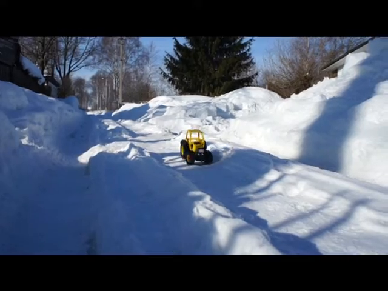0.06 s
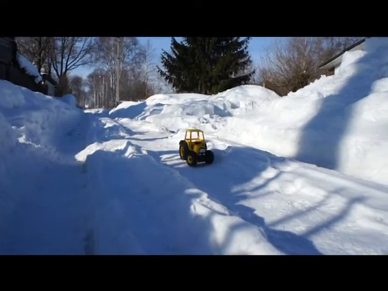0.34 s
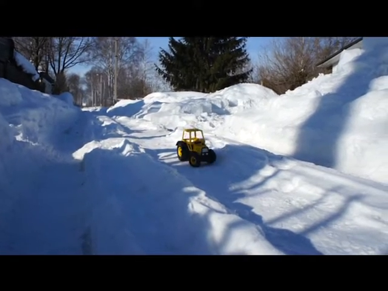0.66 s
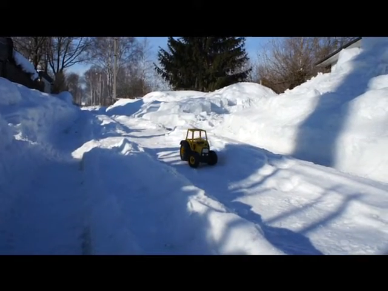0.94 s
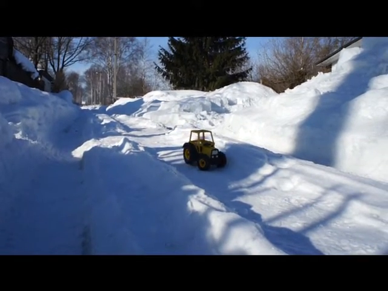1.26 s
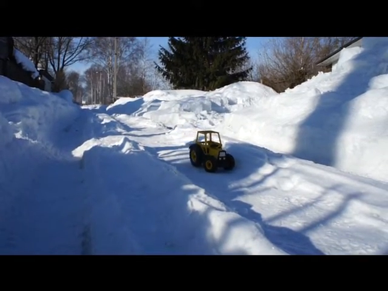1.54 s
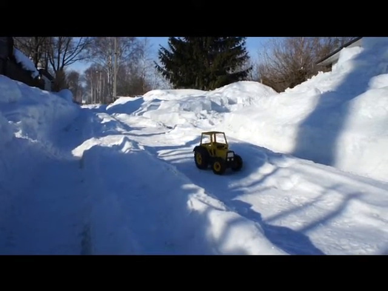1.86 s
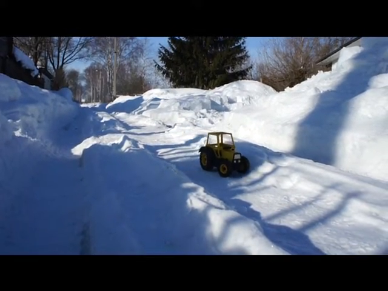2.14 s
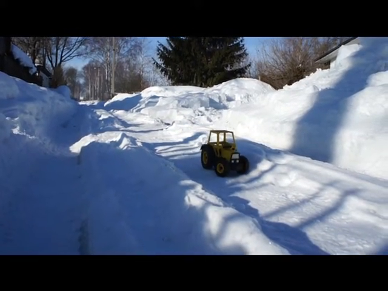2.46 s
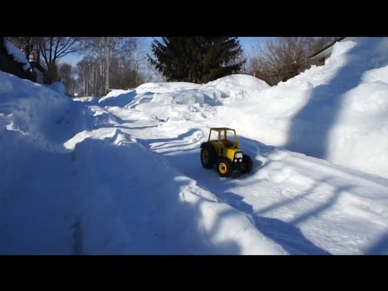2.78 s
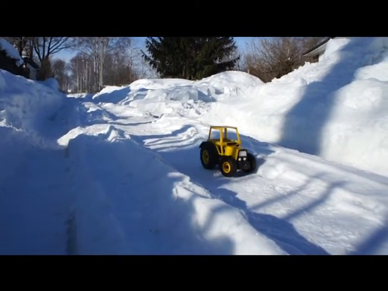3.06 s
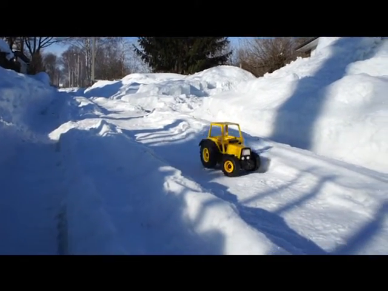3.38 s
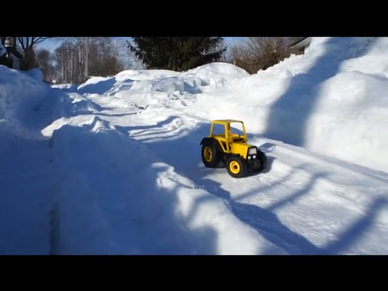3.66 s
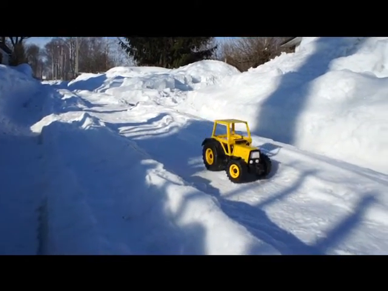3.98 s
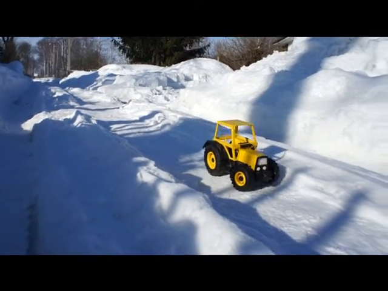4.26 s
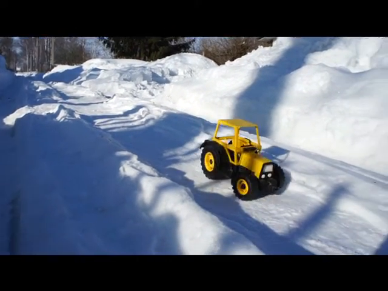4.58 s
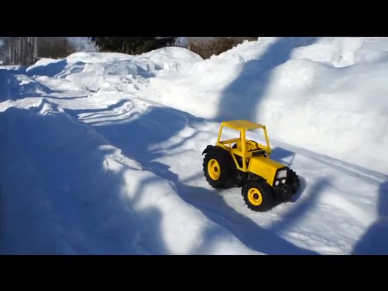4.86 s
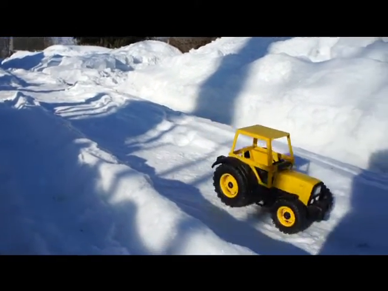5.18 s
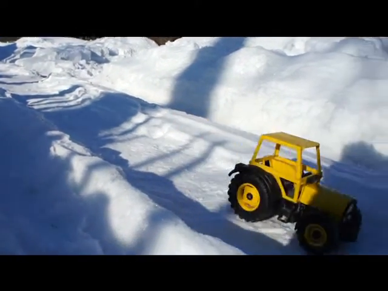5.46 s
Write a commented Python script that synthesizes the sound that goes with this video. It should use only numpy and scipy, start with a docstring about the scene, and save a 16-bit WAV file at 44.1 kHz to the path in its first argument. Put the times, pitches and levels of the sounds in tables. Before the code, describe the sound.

A small motorized toy tractor whirs, rattles and crunches over packed snow, growing louder as it approaches, with one low thump near the end.

```python
"""Toy tractor on packed snow.

A small battery toy crawls between snow banks towards a hand-held camera. Plastic gears whir and labour
in surges under the motor's whizz. Treads crunch the crust and ring the panels, loose parts clack, the
hollow body drones and knocks. Faint open air behind. Near the end a bump on the camera: one low thump."""
import sys
import numpy as np
from scipy import signal
from scipy.fft import rfft, irfft, next_fast_len
from scipy.io import wavfile
from scipy.ndimage import uniform_filter1d, map_coordinates

SR = 44100
rng = np.random.default_rng(int(sys.argv[2]) if len(sys.argv) > 2 else 0)


def transcribe(signal):
    """Save signal, clipped to [-1, 1], as a 16-bit WAV file at the path in sys.argv[1]."""
    frames = np.atleast_2d(signal).T
    limited = np.clip(frames, -1, 1)
    pcm = np.round(limited * 32767).astype(np.int16)
    wavfile.write(sys.argv[1], SR, pcm)


N = 252472
T = np.arange(N) / SR

# Table levels are relative: trims and filters follow.
# gear whir spectrum: f/Hz, gain/dB
WHIR_EQ = [(100, -35), (250, -14), (500, -3), (850, 1.5), (1100, 1), (2150, -1.5), (3200, -0.5),
           (5700, 5.5), (6600, 3.5), (8000, 3), (13000, -43)]
# motor whizz spectrum: f/Hz, gain/dB
WHIZZ_EQ = [(4500, -17), (6500, 2), (7600, -1), (9000, 5.5), (10800, 4), (12100, 2.5), (12700, -11),
            (13200, -64)]
# whizz against the drive level: t/s, level/dB
WHIZZ_SHARE = [(0, 1.5), (0.15, -2.5), (0.7, -1), (1.3, 0), (2.35, -1.5), (3.4, 0.5), (4.05, -0.5),
               (5.35, -4.5), (5.65, -1)]
# motor whine against the drive level: t/s, f/Hz, level/dB
WHINE_TRACK = [(0, 10350, -10.5), (1.1, 10360, -7.5), (1.3, 10120, -6.5), (2.3, 9990, -8.5),
               (3.05, 9990, -9), (3.14, 10780, -9), (3.65, 10540, -8), (3.8, 10280, -10), (5.72, 10330, -7)]
# treads bite, gears labour: start/s, rise/dB, hold/s
SURGES = [(0.107, 3, 0.068), (0.368, 3.5, 0.19), (0.578, 6, 0.029), (0.706, 1.5, 0.053), (0.923, 2, 0.026),
          (1.118, 3.5, 0.27), (1.98, 3, 0.23), (2.491, 3.5, 0.016), (2.676, 2.5, 0.37), (3.01, 2, 0.17),
          (3.445, 3, 0.39), (4.335, 3.5, 0.052)]
# gears fall slack: t/s, depth/dB
LULLS = [(0.07, 1.5), (0.32, 2), (0.512, 10.5), (1.952, 8), (2.975, 12.5), (4.75, 2.5)]
# gears scrape the housing: start/s, end/s, level/dB
GRINDS = [(0.752, 0.967, -51), (1.067, 1.246, -50), (2.0, 2.94, -54), (2.99, 4.19, -51)]
# gearbox housing: f/Hz, width/Hz, gain/dB
HOUSING_MODES = [(2840, 54, -6), (3290, 180, -2), (3850, 72, 3)]
# plastic panels: f/Hz, width/Hz, far gain/dB, near gain/dB
PANEL_MODES = [(1745, 510, 5, 1), (2460, 116, -6, 8), (2756, 98, 8.5, 5.5), (3050, 216, 6, -7),
               (3425, 120, 0.5, 6), (3806, 162, 8.5, -3), (4583, 220, 0.5, -10.5), (5020, 99, -12, -13),
               (7560, 170, 1, -6), (9900, 2700, 2, -37)]
# big tread crunches: centre/s, level/dB, nominal half-length/s, brightness/dB
CRUNCHES = [(0.125, -42, 0.016, -8), (0.248, -37, 0.0036, 7), (0.348, -37, 0.0052, 11.5),
            (0.419, -33.5, 0.0063, 2.5), (0.593, -38.5, 0.0055, 10.5), (0.648, -41, 0.0049, 9),
            (1.025, -35.5, 0.0036, 9), (1.124, -29.5, 0.0036, 14), (1.155, -34, 0.0018, 23.5),
            (1.232, -38, 0.0091, 9), (1.313, -30.5, 0.0036, 5), (1.585, -37, 0.0042, -1),
            (2.127, -35.5, 0.0054, -0.5), (2.516, -35, 0.0044, -2), (2.683, -33, 0.0024, 15),
            (2.809, -32.5, 0.0058, 9), (2.918, -30, 0.0037, -0.5), (2.943, -32.5, 0.0046, 5),
            (3.001, -34, 0.0055, 22), (3.05, -31.5, 0.0059, 10), (3.474, -34, 0.008, 0.5),
            (3.918, -29.5, 0.0071, 8), (4.045, -29.5, 0.011, 0), (4.156, -27, 0.0028, 18),
            (4.321, -29, 0.0039, 8), (4.349, -25.5, 0.0045, 11), (4.44, -26, 0.0034, 17),
            (4.488, -23, 0.0055, 13.5), (4.632, -27.5, 0.017, 23), (4.705, -26, 0.0042, 10),
            (4.822, -24.5, 0.0063, 4.5), (4.847, -24, 0.0083, 3), (4.8975, -21, 0.0041, 11),
            (5.023, -27.5, 0.0052, 8.5), (5.082, -23, 0.016, 1.5), (5.124, -23.5, 0.0095, 0.5),
            (5.149, -22, 0.0047, -8), (5.306, -21.5, 0.0057, 9), (5.418, -20, 0.0026, -9),
            (5.46, -20, 0.0027, -4), (5.483, -26.5, 0.0035, 9), (5.535, -26.5, 0.015, -21),
            (5.578, -25.5, 0.013, 27), (5.635, -22.5, 0.0082, 2), (5.692, -22.5, 0.0021, 9.5)]
# crunch spectrum: f/Hz, gain/dB
CRUNCH_EQ = [(100, -19), (300, -1.5), (600, 10.5), (1100, 3.5), (2000, -0.5), (3500, 0), (5500, 4.5),
             (7000, 3), (10500, 2), (12400, -6), (13400, -84)]
# crust snaps: t/s, level/dB, f/Hz
SNAPS = [(0.374, -27.5, 3500), (1.1255, -20.5, 6400), (2.915, -24.5, 2510), (4.352, -15, 2600),
         (4.424, -16, 5000), (4.5462, -5.5, 5370), (4.619, -16, 4520), (4.821, -18, 2690),
         (4.896, -25, 3800), (5.018, -17, 3200), (5.083, -18, 2990), (5.145, -16, 3000),
         (5.2562, -20, 2400), (5.4143, -18, 2800), (5.459, -16.5, 2500), (5.631, -18, 2500)]
# hollow body: f/Hz, width/Hz, far gain/dB, near gain/dB
BODY_MODES = [(530, 78, -50, -4), (583, 49, -16, 11.5), (663.4, 41, 15, 18.5), (760, 49, 12, -4)]
# drive strains or slackens, drone follows: centre/s, change/dB, half-length/s
STRAINS = [(0.766, 7, 0.045), (0.997, 7, 0.028), (1.294, 9, 0.079), (1.547, 7, 0.06), (2.504, 9, 0.03),
           (3.076, 6, 0.088), (3.56, 2.5, 0.32), (4.434, -1.5, 0.1), (4.85, -14, 0.046), (4.992, -5, 0.016),
           (5.106, -10, 0.036), (5.23, -5, 0.014), (5.575, -7, 0.011)]
# hard jolts to the body: t/s, level/dB
KNOCKS = [(0.16, -34), (0.411, -32), (0.551, -33.5), (1.324, -30), (1.835, -34), (1.881, -32),
          (2.096, -31.5), (2.18, -31.5), (2.711, -31.5), (2.914, -28.5), (3.24, -32.5), (3.468, -41),
          (4.036, -27.5), (4.4, -38), (4.59, -28), (4.768, -20.5), (4.828, -21), (4.914, -21.5),
          (4.965, -31), (5.019, -23), (5.072, -21.5), (5.123, -21.5), (5.256, -27), (5.432, -24),
          (5.499, -14.5), (5.524, -20.5)]
# loose parts hit the chassis: t/s, level/dB, f/Hz
CLACKS = [(0.183, -34, 2780), (0.356, -29.5, 1810), (0.373, -27.5, 2830), (0.422, -35, 3400),
          (0.648, -35, 3100), (1.025, -30.5, 3010), (1.169, -36, 1900), (1.324, -27, 1740),
          (1.524, -34.5, 1770), (1.816, -33, 1720), (2.099, -34, 2020), (2.915, -24.5, 1770),
          (3.228, -30.5, 2770), (3.24, -29, 1647), (3.974, -28, 2750), (4.037, -28, 1750),
          (4.105, -28, 2460), (4.768, -22.5, 2510), (5.127, -22.5, 2820), (5.254, -21.5, 1625),
          (5.339, -25, 1240), (5.416, -19, 1670)]
# wheel drops into a rut: t/s, level/dB, f/Hz
THUDS = [(0.123, -44, 356), (1.489, -42, 295), (2.275, -43, 200)]
# camera shudders: start/s, length/s, f/Hz, level/dB, left minus right/dB
SHUDDERS = [(5.3003, 0.036, 86, -11.5, 0.5), (5.3011, 0.048, 255, -23, -9),
            (5.3005, 0.0069, 210, -13, -8.5), (5.305, 0.0267, 170, -21, -8), (5.321, 0.019, 480, -25.5, 9)]
# approach: t/s, distance/m
DISTANCE = [(0, 3.87), (1.7, 2.26), (3.3, 1.48), (4.2, 0.81), (4.7, 0.54), (5.72, 0.37)]
# path to the microphone ports: t/s, left port lag/ms, snow bounce lag/ms, left minus right/dB
PATH = [(0, 0.03, 1.1, 1.5), (2, 0.057, 1.2, 0), (4.2, 0.052, 1.05, 0), (5.1, 0.055, 1.52, -0.5),
        (5.72, 0.11, 2.5, -0.5)]
# open air spectrum: f/Hz, gain/dB
AIR_EQ = [(25, -36), (60, -28), (110, -11.5), (170, -3.5), (280, 0), (450, -2.5), (1000, -4), (4000, -17.5),
          (13000, -60)]


def gears(drive_db, shaft_hz=40, wobble=0.038, throb_db=0.1, flutter_db=1.6):
    """Teeth tick densely, barely pulsed by an uneven shaft; the motor whizzes above."""
    shaft_rad = 2 * np.pi * np.cumsum(shaft_hz * (1 + wobble * walk(2.3))) / SR
    pulse_db = throb_db * (np.cos(shaft_rad) + np.cos(2 * shaft_rad))
    teeth = grains(rate_hz=5000, spread_db=0.5) * undb(pulse_db + flutter_db * walk(90))
    whir = plastic(teeth, WHIR_EQ, waver_db=2.5, panels_db=3.5)
    motor = grains(rate_hz=24000, spread_db=1.5) * undb(pulse_db)
    whizz = plastic(motor, WHIZZ_EQ, waver_db=5.5)
    return whir * undb(drive_db - 3) + whizz * undb(drive_db + curves(WHIZZ_SHARE)[0] - 4.5)


def gear_load_db(attack_s=0.004, release_s=0.012, lull_s=0.017):
    """Load jumps as the treads bite, holds, eases off; lulls dip it."""
    load_db = np.zeros(N)
    for start_s, rise_db, hold_s in SURGES:
        attack = np.clip((T - start_s) / attack_s, 0, 1)
        release = np.exp(-np.maximum(T - start_s - hold_s, 0) / release_s)
        load_db += rise_db * attack * release
    for at_s, depth_db in LULLS:
        load_db -= depth_db * np.exp(-((T - at_s) / lull_s) ** 2)
    return load_db


def whine(drive_db, near_loss_db=12, tremble_hz=300, wander=0.009):
    """Thin motor tone with trembling pitch; sinks under the gears close by."""
    hz, share_db = curves(WHINE_TRACK)
    tone = np.sin(2 * np.pi * np.cumsum(hz * (1 + wander * walk(tremble_hz))) / SR)
    return unit(tone) * undb(drive_db + share_db - near_loss_db * nearness(T))


def grind(fade_s=0.016, waver_db=2.3):
    """Teeth scrape under load and ring the housing in spells."""
    teeth = ring(grains(rate_hz=1500, spread_db=3.5), hz=3430, width_hz=1800)
    scrape = unit(sum(undb(db) * ring(teeth, hz, width_hz) for hz, width_hz, db in HOUSING_MODES))
    gate = sum(undb(db) * np.clip(np.minimum(T - start_s, end_s - T) / fade_s, 0, 1)
               for start_s, end_s, db in GRINDS)
    return scrape * undb(waver_db * walk(15)) * gate


def crunches(rows, trim_db=-2.5, ring_db=-8, crumble_db=-14, crumble_s=0.016):
    """Each crunch: a short swarm of cracks, settling crumbs, one ringing panel."""
    dull_power, bright_power, rings = np.zeros((3, N))
    ticks = grains(rate_hz=5000, spread_db=-2)
    for at_s, db, half_s, bright_db in rows:
        span = slice(max(int((at_s - 0.1) * SR), 0), int((at_s + 0.1) * SR))
        t = T[span] - at_s
        burst = undb(db + trim_db) ** 2 / (1 + (t / (0.87 * half_s)) ** 6)
        crumbs = undb(db + crumble_db) ** 2 * (t > 0) * np.exp(-np.abs(t) / crumble_s)
        power = burst + crumbs
        bright_ratio = undb(bright_db - 4) ** 2
        dull_power[span] += 2 * power / (1 + bright_ratio)
        bright_power[span] += 2 * power * bright_ratio / (1 + bright_ratio)
        aim_hz = 2085 * 2 ** (bright_db / 14.5)  # sharper crunch, smaller panel
        panel_hz = min((mode[0] for mode in PANEL_MODES), key=lambda hz: abs(hz - aim_hz))
        panel = ring(ticks[span] * np.sqrt(power), panel_hz, width_hz=220)
        rings[span] += undb(ring_db) * unit(panel) * np.sqrt(power.mean())
    cracks = plastic(grains(rate_hz=7000, spread_db=2.5), CRUNCH_EQ, waver_db=2)
    treble = signal.sosfiltfilt(signal.butter(2, 3200, "high", fs=SR, output="sos"), cracks)
    return (cracks - treble) * np.sqrt(dull_power) + treble * np.sqrt(bright_power) + rings


def lugs(level_db, rate_hz=11, jitter_s=0.02, spread_db=3.5, near_loss_db=7, half_s=0.003, count=90):
    """Lugs land unevenly, harder under load, less prominent close by: crunch and jolt rows."""
    late, crunch, bright, jolt = np.sqrt(3) * rng.uniform(-1, 1, (count, 4)).T
    at_s = (np.arange(count) + 0.5) / rate_hz + jitter_s * late
    lug_db = np.interp(at_s, T, level_db) - near_loss_db * nearness(at_s)
    crunch_db = lug_db - 34.5 + spread_db * crunch
    jolt_db = lug_db - 38 + spread_db * jolt
    bright_db = 6 + 4 * bright
    crunch_rows = np.column_stack([at_s, crunch_db, np.full(count, half_s), bright_db])
    jolt_rows = np.column_stack([at_s, jolt_db])
    inside = (at_s > 0) & (at_s < T[-1])
    return list(crunch_rows[inside]), list(jolt_rows[inside])


def snaps(decay_s=0.0012):
    """Crust breaks at once: a bright crack."""
    out, t = np.zeros(N), T[:N // 500]
    for at_s, db, hz in SNAPS:
        crack = unit(ring(rng.standard_normal(len(t)), hz, width_hz=6000))
        add_at(out, at_s, undb(db) * crack * np.exp(-t / decay_s))
    return butter(out, 3, [450, 10500], "band")


def grit(drive_db, share_db=-8, near_loss_db=2):
    """Ice crystals snap under the lugs: fine treble ticks."""
    ticks = butter(grains(rate_hz=700, spread_db=2.5), 3, [2200, 10500], "band")
    return unit(ticks) * undb(drive_db + share_db - near_loss_db * nearness(T))


def body(drone_db, jolts, flutter_db=2, attack_s=0.003, decay_s=0.012, far_hz=700, near_hz=630):
    """Running gear keeps the hollow shell droning; jolts set it chattering, each at its own pitch."""
    strain_db = sum(db * np.exp(-((T - at_s) / half_s) ** 4) for at_s, db, half_s in STRAINS)
    drive = grains(rate_hz=1100, spread_db=0.5) * undb(flutter_db * walk(24.97))
    shell = unit(turning_modes(drive, BODY_MODES, waver_db=-1.5)) * undb(drone_db + strain_db)
    t = T[:SR // 12]
    push = (1 - np.exp(-t / attack_s)) * np.exp(-t / decay_s)
    chatter = 1 + 0.64 * (walk(220) + 1j * walk(220))  # roughens level and phase
    for at_s, db in jolts:
        hz = (far_hz + (near_hz - far_hz) * nearness(at_s)) * (1 + 0.032 * rng.standard_normal())
        knock = undb(db - 6.5) * push / push.max() * np.exp(2j * np.pi * hz * t)
        rough = chatter[int(at_s * SR):][:len(t)]
        add_at(shell, at_s, np.imag(rough * knock[:len(rough)]))
    return butter(shell, 2, [260, 1800], "band")  # a small shell radiates little bass


def clacks(decay_s=0.0057, tick_s=0.001, pair_ratio=1.13, pair_db=-7, tick_db=-4, trim_db=-1):
    """A loose part hits the chassis: dry tick, then two close panel modes."""
    out, t = np.zeros(N), T[:SR // 12]
    for at_s, db, hz in CLACKS:
        phase = 2 * np.pi * hz * t
        panel = (np.sin(phase) + undb(pair_db) * np.sin(pair_ratio * phase)) * np.exp(-t / decay_s)
        tick = unit(ring(rng.standard_normal(len(t)), hz, width_hz=3000)) * np.exp(-t / tick_s)
        add_at(out, at_s, undb(db + trim_db) * (panel + undb(tick_db) * tick))
    return butter(out, 2, [700, 6000], "band")


def thuds(width_hz=170, decay_s=0.016, trim_db=-2):
    """A soft tyre lands on packed snow: a short dull burst."""
    out, t = np.zeros(N), T[:SR // 10]
    for at_s, db, hz in THUDS:
        burst = rng.standard_normal(len(t)) * np.exp(-t / decay_s)
        thud = ring(ring(burst, hz, width_hz), hz, width_hz)
        add_at(out, at_s, undb(db + trim_db) * thud / np.abs(thud).max())
    return butter(out, 2, 140, "high")


def bump(release_s=5.3557, tick_s=0.00051, tick_db=-12.5):
    """The camera shudders during contact; a dull tick on release."""
    out = pan(0) * undb(tick_db) * np.exp(-((T - release_s) / tick_s) ** 2)
    for start_s, length_s, hz, db, pan_db in SHUDDERS:
        contact = signal.windows.tukey(int(length_s * SR), 0.67)
        shudder = contact * np.sin(2 * np.pi * hz * T[:len(contact)])
        add_at(out, start_s, pan(pan_db) * undb(db) * shudder)
    return out


def rasp(start_s=5.302, length_s=0.041, hz=12300, width_hz=3200, db=-33):
    """A brief high rasp on the thump."""
    hiss = unit(ring(ring(rng.standard_normal(N), hz, width_hz), hz, width_hz))
    return undb(db) * hiss * np.sin(np.pi * np.clip((T - start_s) / length_s, 0, 1))


def snow_lane(x, cracks, bounce_gain=0.068, banks_ms=(0.9, 1.45), lump_ms=0.37, lumps=3):
    """Direct sound, snow bounce and scatter off lumpy banks reach two ports; cracks mostly direct."""
    port_ms, bounce_ms, pan_db = curves(PATH)
    arrival = x + cracks + bounce_gain * delay(x, bounce_ms)
    analytic = signal.hilbert(x + undb(-7) * cracks, next_fast_len(N))[:N]
    echoes = np.zeros((2, N))
    for side, bank_ms in enumerate(banks_ms):
        for k in range(lumps):
            lag_s = (bank_ms + lump_ms * k ** 1.3) / 1000
            phase_drift = np.exp(1j * np.pi * walk(45))
            add_at(echoes[side], lag_s, np.real(analytic * phase_drift) / np.sqrt(lumps))
    scatter = colour(echoes, [(650, -9), (2500, -1.8), (8000, 0.8)])
    ports = np.array([delay(arrival, port_ms), arrival]) + scatter
    return ports * undb(np.array([pan_db, -pan_db]) / 2)


def open_air(db=-53.5):
    """Faint low rush, partly different at each port."""
    common, left, right = rng.standard_normal((3, N))
    return unit(colour(common + np.array([left, right]), AIR_EQ)) * undb(db)


def plastic(x, eq, waver_db, panels_db=0):
    """Excitation plus panel resonances, coloured; rms 1."""
    return unit(colour(x + undb(panels_db) * turning_modes(x, PANEL_MODES, waver_db), eq))


def turning_modes(x, modes, waver_db):
    """Mode levels waver as the toy rocks and shift as it turns side-on."""
    near = nearness(T)
    return sum(ring(x, hz, width_hz) * undb(far_db + near * (near_db - far_db) + waver_db * walk(9.7))
               for hz, width_hz, far_db, near_db in modes)


def nearness(at_s):
    """0 far off, 1 close and side-on at the end."""
    return (at_s / T[-1]) ** 2


def grains(rate_hz, spread_db):
    """Random clicks of uneven size; rms 1."""
    size = undb(spread_db * np.minimum(rng.standard_exponential(N), 4))
    return unit((rng.random(N) < rate_hz / SR) * size * rng.standard_normal(N))


def walk(rate_hz):
    """Random steps, smoothed twice; spread near 1."""
    hold = max(int(SR / rate_hz), 1)
    steps = np.repeat(rng.standard_normal(N)[:N // hold + 1], hold)
    return 1.204 * uniform_filter1d(uniform_filter1d(steps, hold), hold)[:N]


def colour(x, eq):
    """Filter by (f/Hz, gain/dB) points."""
    hz, db = np.transpose(eq)
    size = next_fast_len(N + 4096)
    bins_hz = np.maximum(np.fft.rfftfreq(size, 1 / SR), 1)
    gain = undb(np.interp(np.log(bins_hz), np.log(hz), db))
    return irfft(rfft(x, size) * gain, size)[..., :N]


def ring(x, hz, width_hz):
    """One resonance."""
    return signal.lfilter(*signal.iirpeak(hz, hz / width_hz, SR), x)


def butter(x, order, hz, kind):
    """Causal filter, flat passband."""
    return signal.sosfilt(signal.butter(order, hz, kind, fs=SR, output="sos"), x)


def delay(x, ms):
    """Moving delay."""
    return map_coordinates(x, [np.arange(N) - ms * SR / 1000], order=3)


def add_at(out, at_s, x):
    """Mix x in place, cut at the end of out."""
    span = out[..., int(at_s * SR):][..., :x.shape[-1]]
    span += x[..., :span.shape[-1]]


def curves(table):
    """Columns after t/s, interpolated per sample."""
    at_s, *columns = np.transpose(table)
    return [np.interp(T, at_s, column) for column in columns]


def pan(db):
    """Stereo gains for left minus right."""
    return undb(np.array([[db], [-db]]) / 2)


def undb(db):
    """dB to gain."""
    return 10 ** (np.asarray(db) / 20)


def unit(x):
    """Scale to rms 1."""
    return x / np.sqrt(np.mean(x ** 2))


def scene(rattle_low_hz=110, rattle_top_hz=12900):
    """The tractor in its lane, drive and drone scaled by 1 / distance; bump and open air."""
    distance_db = -20 * np.log10(curves(DISTANCE)[0])
    level_db = distance_db + gear_load_db()
    drive_db, drone_db = level_db - 37.5, distance_db - 47
    lug_crunches, lug_jolts = lugs(level_db)
    rattle = gears(drive_db) + whine(drive_db) + grind() + crunches(list(CRUNCHES) + lug_crunches)
    rattle = snow_lane(rattle, cracks=grit(drive_db) + snaps() + clacks())
    rattle = butter(rattle, 2, rattle_low_hz, "high")
    rattle = signal.sosfilt(signal.ellip(8, 0.2, 60, rattle_top_hz, fs=SR, output="sos"), rattle)
    rest = thuds() + open_air() + bump() + rasp() * pan(-12)
    shell = body(drone_db, list(KNOCKS) + lug_jolts) * pan(4)
    return rattle + shell + rest


def record(dry):
    """Steep low-pass at 14.1 kHz."""
    return signal.sosfilt(signal.ellip(10, 0.2, 80, 14100, fs=SR, output="sos"), dry)


dry = scene()
out = record(dry)
transcribe(out)
```